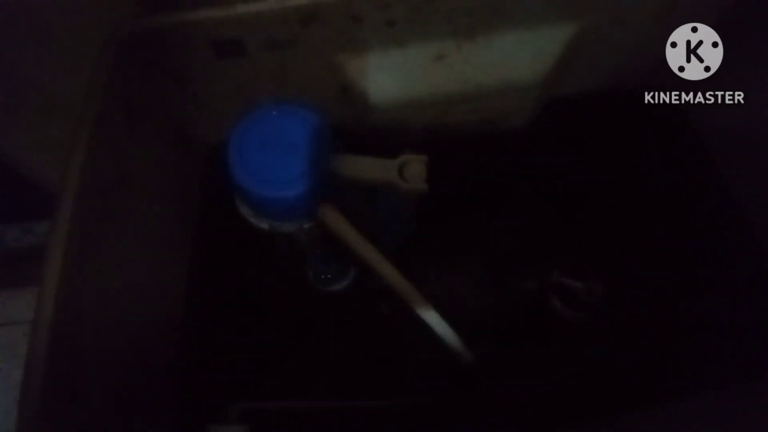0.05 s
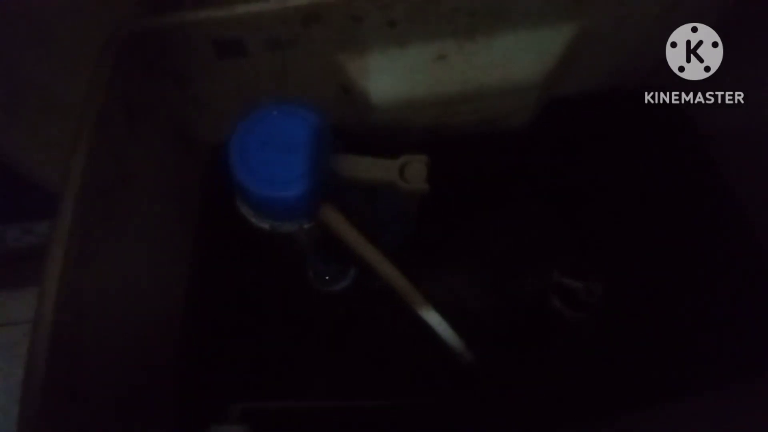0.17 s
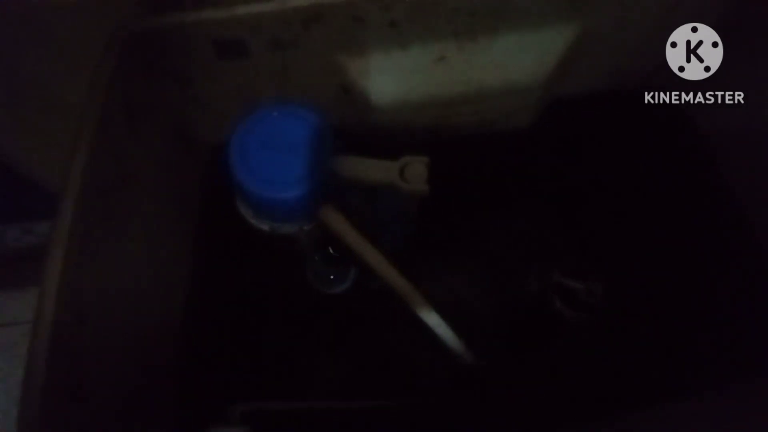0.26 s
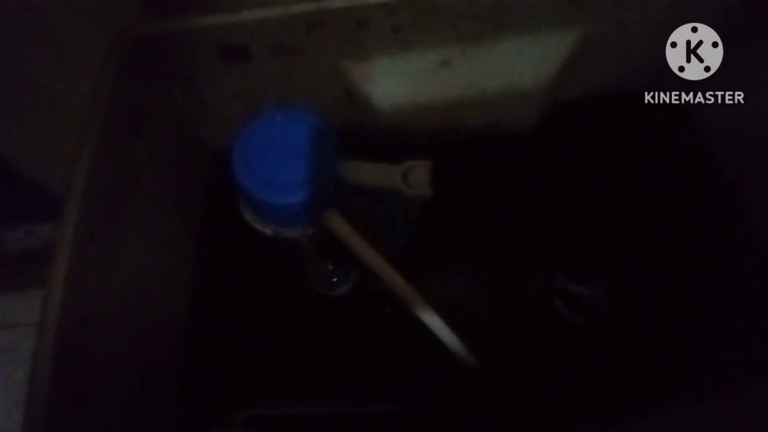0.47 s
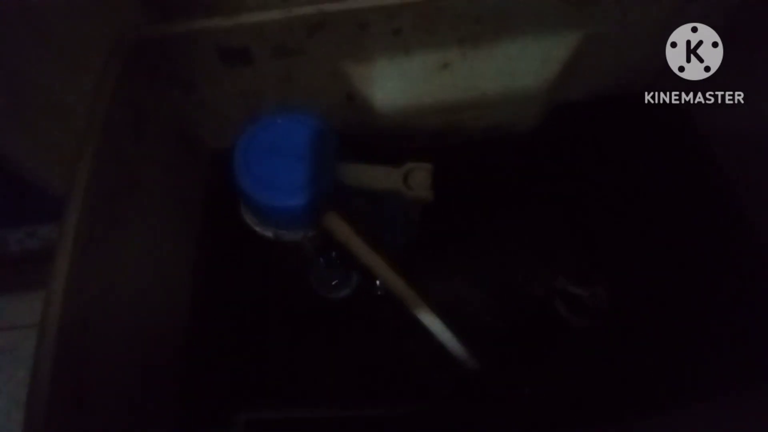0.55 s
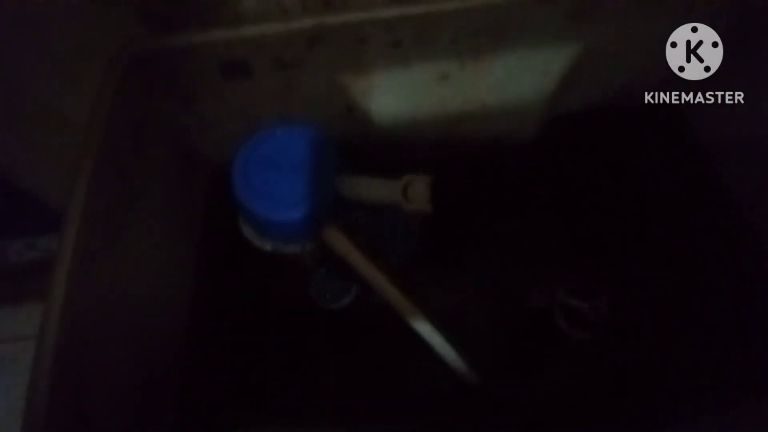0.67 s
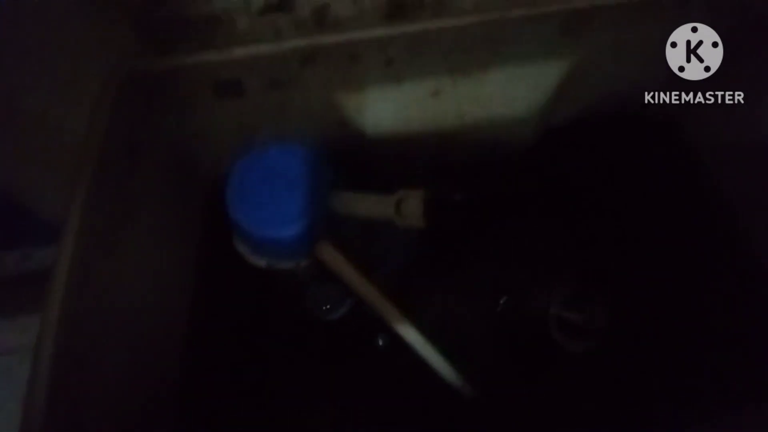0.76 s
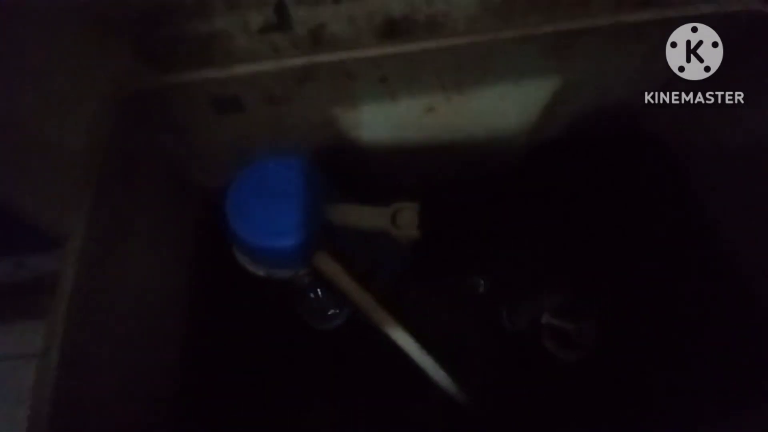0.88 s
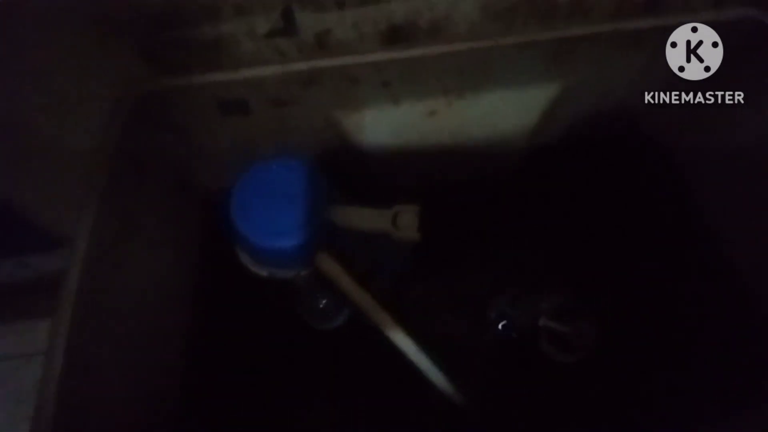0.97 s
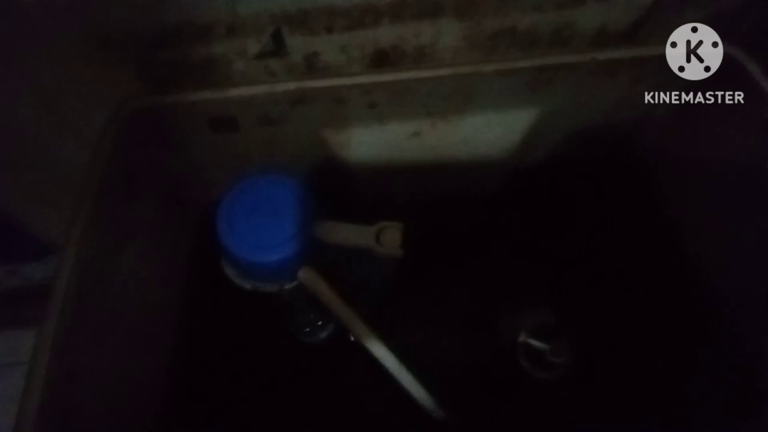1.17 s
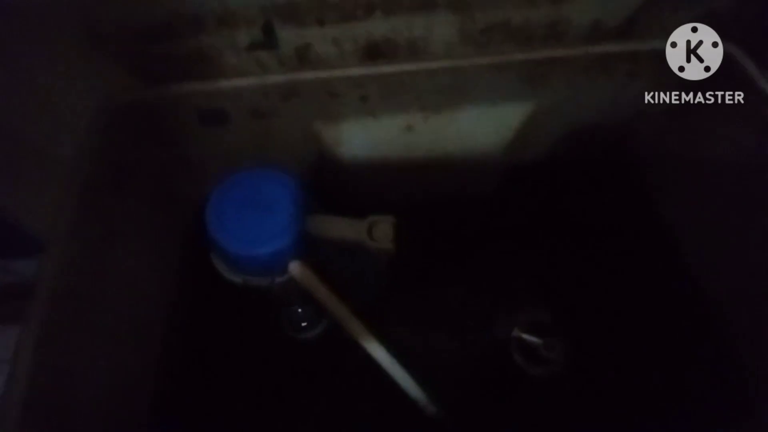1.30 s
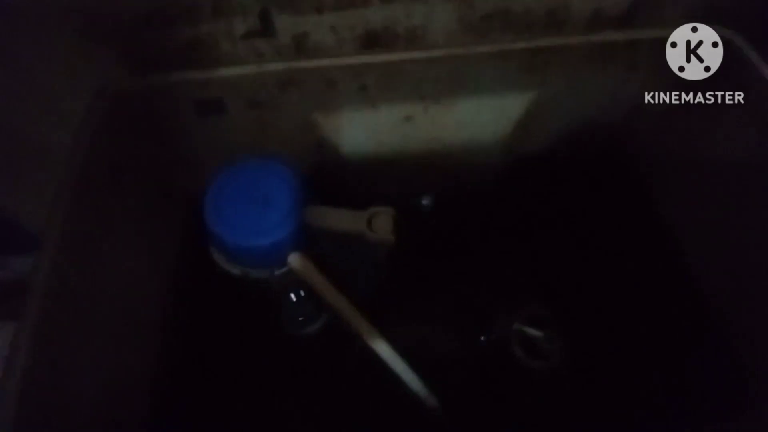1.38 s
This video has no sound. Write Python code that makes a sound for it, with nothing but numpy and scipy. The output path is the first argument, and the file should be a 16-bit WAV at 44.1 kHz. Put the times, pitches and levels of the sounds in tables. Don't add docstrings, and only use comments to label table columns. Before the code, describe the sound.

Knocks ring hollow in an open toilet tank, heard close in a small tiled room. Until 0.45 s, soft taps and faint rattles sit over hissing valve spray. From 0.5 to 0.9 s come rapid loud thuds and clacks, with splashes strongest near 0.62 and 0.77 s and a low gurgle. A last firm thud lands near 1.06 s; then spray fades, leaving tiny drips and faint rumble until about 1.45 s.

```python
import sys
import numpy as np
from scipy import signal
from scipy.fft import rfft, irfft
from scipy.io import wavfile

SR = 44100
rng = np.random.default_rng(int(sys.argv[2]) if len(sys.argv) > 2 else 0)


def to_wav(sig):
    pcm = np.clip(np.atleast_2d(sig), -1, 1) * 32767
    pcm = np.round(pcm).astype(np.int16)
    wavfile.write(sys.argv[1], SR, pcm.T)


def makeup_ratio(level_db):
    decades = np.asarray(level_db, float) / 20
    return 10 ** decades


N = 63945

# (frequency [Hz], level [dB])
MIDDLE_MODES = [(712, 0.5), (782, 1.5), (809, 1.5), (862, -4.5), (945, 3), (1050, -9), (1140, -12.5)]
# (frequency [Hz], level [dB])
UPPER_MODES = [(1211, -15.5), (1325, 0), (1520, -2.5), (1686, 3), (1760, 0.5), (1974, -16.5), (2075, -1),
               (2326, -7.5), (2616, -8.5), (2750, -19), (2850, -5), (3250, -26), (3600, -7.5), (4050, -0.5)]


def thuds():
    # (time [s], level [dB], pitch [Hz], time until damped [s])
    thud_events = [(.02, -40.5, 214.4, 0.11), (.09, -56, 207, 0.14), (.178, -30.5, 206.3, 0.088),
                   (.222, -31.5, 226, 0.037), (.342, -38.5, 208.3, 0.12), (.44, -25.5, 206, 0.15),
                   (.526, -10, 226.5, 0.042), (.57, -9, 230.5, 0.01), (.627, -9.5, 218.2, 0.041),
                   (.672, -22.5, 254, 0.023), (.72, -20, 268, 0.045), (.756, -9.5, 214.5, 0.017),
                   (.795, -16.5, 198.2, 0.067), (.865, -11, 211.5, 0.024), (.915, -24, 211, 0.031),
                   (.962, -25, 199, 0.043), (1.005, -24, 198.6, 0.029), (1.058, -11, 204.8, 0.043),
                   (1.11, -21, 208.8, 0.032), (1.14, -21.5, 203.4, 0.027), (1.19, -29.5, 184.7, 0.039),
                   (1.282, -42.5, 210, 0.032)]
    # (frequency [Hz], level [dB])
    lower_modes = [(84.7, -29.5), (140, -1), (157.7, -3.5), (200, -7), (266, -0.5), (321.2, -3.5),
                   (405, -13), (480, -17.5), (548, -30)]
    return knocks(thud_events, lower_modes, t60=0.39, rise_s=0.0088, modes_db=-6.5, reach_oct=0.28,
                  damped_db=-12.0, rough=0.17, rough_hz=39.7, cuts_last=-12)


def taps():
    # (time [s], level [dB], pitch [Hz], time until damped [s])
    tap_events = [(.18, -35.5, 750, 0.038), (.206, -21, 924.6, 0.018), (.235, -28.5, 759, 0.039),
                  (.258, -28, 890, 0.019), (.293, -25, 929, 0.05), (.402, -17, 897, 0.029),
                  (.488, -21.5, 900, 0.0048), (.5, -23.5, 769, .025), (.526, -21, 832, 0.036),
                  (.558, -12, 838, 0.01), (.573, -10.5, 775, 0.027), (.575, -12, 953, 0.0065),
                  (.617, -8, 785.7, 0.0082), (.633, -14.5, 813, 0.0048), (.656, -21, 703, 0.013),
                  (.682, -25, 807, 0.017), (.72, -30, 810, 0.029), (.757, -24, 817, 0.0044),
                  (.766, -13.5, 804.3, 0.0076), (.785, -24.5, 803, 0.023), (.834, -17.5, 793, 0.01),
                  (.865, -20, 800, 0.022), (.905, -18.5, 795, 0.0093), (.932, -20, 821, 0.0079),
                  (.95, -25.5, 816, 0.014), (.978, -26.5, 779, 0.0055), (.997, -35.5, 755, 0.0075),
                  (1.015, -31, 852, 0.021), (1.04, -35, 837, 0.024), (1.09, -46, 886, 0.026),
                  (1.16, -56, 923, 0.051), (1.277, -39, 721, 0.11)]
    return knocks(tap_events, MIDDLE_MODES, t60=0.27, rise_s=0.0021, modes_db=-12.5, reach_oct=0.15,
                  damped_db=-11.5, rough=0.37, rough_hz=73.0, cuts_last=-5.0)


def clacks():
    # (time [s], level [dB], pitch [Hz], time until damped [s])
    clack_events = [(.018, -36, 3900, 0.016), (.03, -33.5, 3120, 0.038), (.06, -32.5, 1480, 0.022),
                    (.085, -30.5, 2140, .04), (.14, -36, 2110, 0.026), (.11, -31.5, 2702, 0.16),
                    (.222, -34.5, 1558, .03), (.207, -29, 2030, 0.034), (.335, -35.5, 2850, 0.016),
                    (.402, -30.5, 1547, 0.042), (.496, -25, 2314, 0.13), (.497, -30, 2662, 0.063),
                    (.495, -28, 1305, 0.018), (.525, -25.5, 1222, 0.039), (.538, -16, 1668, 0.0074),
                    (.55, -23, 1522, 0.032), (.556, -31.5, 1843, 0.014), (.595, -37, 1600, .015),
                    (.616, -25, 1194, 0.024), (.545, -20.5, 2039, 0.043), (.557, -26, 1237, 0.015),
                    (.618, -18.5, 1970, 0.017), (.627, -26.5, 2557, 0.032), (.64, -28, 1576, 0.023),
                    (.65, -27, 1215, 0.15), (.766, -27, 3265, 0.18), (.758, -28.5, 4380, 0.033),
                    (.775, -13.5, 2329, 0.048), (.757, -24, 1216, 0.046), (.765, -26.5, 4060, 0.026),
                    (.766, -27, 2887, 0.026), (.78, -23, 2102, 0.026), (.782, -33, 1517, 0.036),
                    (.785, -22.5, 2614, 0.06), (.779, -16.5, 1688, 0.055), (.815, -29.5, 1165, 0.095),
                    (.868, -34, 1218, 0.1), (.97, -40.5, 2030, 0.02), (1.018, -29.5, 1314, 0.026),
                    (1.015, -36.5, 1792, 0.029), (1.06, -40.5, 1313, 0.11), (1.1, -39, 1732, 0.035),
                    (1.19, -40, 2150, 0.051), (1.295, -38, 1339, 0.078), (1.29, -49, 1765, 0.033),
                    (1.355, -47.5, 3110, 0.0052)]
    return knocks(clack_events, UPPER_MODES, t60=0.46, rise_s=0.0036, modes_db=-7.5, reach_oct=0.18,
                  damped_db=-14.0, rough=0.5, rough_hz=149, cuts_last=-0.2)


def knocks(rows, modes, t60, rise_s, modes_db, reach_oct, damped_db, rough, rough_hz, cuts_last):
    damp_s = 0.004
    t = np.arange(SR // 3) / SR
    out = np.zeros(N + SR)
    hz, level_db = np.transpose(modes)[:, :, None]
    decay = np.log(1000) * t / t60
    fade_out = np.cos(t / t[-1] * np.pi / 2)
    rise = np.sin(np.pi / 2 * np.minimum(t / rise_s, 1)) ** 2

    luck = rng.standard_normal((len(rows), 2, len(modes), 1))
    grit = rng.standard_normal((len(rows), 2, 4, len(t)))
    grit = rms_one(signal.sosfilt(signal.butter(3, rough_hz, fs=SR, output="sos"), grit))
    waver = (1 - rough) + rough * (grit[:, 0] + 1j * grit[:, 1]) / np.sqrt(2)

    next_times = [row[0] for row in rows[1:]] + [9]
    for (s, db, near_hz, hold), after, (gain, phase), wobble in zip(rows, next_times, luck, waver):
        distance = np.minimum((np.log2(hz / near_hz) / reach_oct) ** 2, 3.5)
        weight = makeup_ratio(modes_db + level_db + 2.0 * gain - 4.97 * distance)
        body = weight * np.exp(2j * np.pi * (hz * t + phase) - decay) * wobble[np.arange(len(modes)) % 3]
        own = np.exp(2j * np.pi * near_hz * t - decay) * (1 + wobble[3]) / 2
        damping = damped_db * np.clip((t - hold) / damp_s, 0, 1)
        damping = damping + cuts_last * np.clip((t + s - after) / damp_s, 0, 1)
        shape = rise * makeup_ratio(db + damping) * fade_out
        out[int(s * SR):][:len(t)] += shape * (own + body.sum(axis=0)).imag
    return out[:N]


def splashes():
    # (time [s], level [dB], rise [s], t60 [s], brightness of the top [dB])
    splash_events = [(0.018, -33, 0.012, 0.98, -7), (.1, -54, 0.024, 0.21, 18),
                     (0.21, -45, 0.0044, 0.15, -19), (0.363, -38, 0.005, 0.21, 15),
                     (0.495, -39.5, 0.0097, 0.36, 5.5), (.545, -32.5, 0.0072, 0.3, 5),
                     (0.618, -24, 0.0045, 0.42, 6), (0.757, -20, 0.0049, 0.3, 7.5),
                     (.768, -18.5, 0.011, 0.35, 2), (0.866, -62, .005, 0.27, 0),
                     (1.016, -39, 0.017, 0.59, 5.5), (1.065, -41, 0.027, 0.39, 16),
                     (1.238, -47.5, 0.0086, 0.16, 11)]
    # (frequency [Hz], level per Hz [dB])
    splash_colour = [(300, -10.5), (600, -16.5), (2000, -2), (3200, 5), (4500, -10.5), (6000, -22),
                     (10000, -41), (15500, -54.5)]
    t = np.arange(N) / SR
    hiss = coloured(splash_colour, 2.0, rng.standard_normal(N))
    sung = 0
    for hz, db in MIDDLE_MODES + UPPER_MODES:
        sung = sung + makeup_ratio(db / 2 + 3 * drift(15.0)) * ring(hiss, hz, t60=0.094)
    hiss = hiss + makeup_ratio(-5) * rms_one(sung)
    top = signal.sosfilt(signal.butter(2, 4920, "high", fs=SR, output="sos"), hiss)

    out = np.zeros(N)
    for s, db, rise, t60, bright_db in splash_events:
        envelope = makeup_ratio(db - 60 * np.maximum(t - s, 0) / t60) * np.clip((t - s) / rise, 0, 1)
        out += envelope * (hiss + (makeup_ratio(bright_db) - 1) * top)
    return out


def spray():
    # (time [s], level [dB])
    flow_levels = [(0, -35.5), (.1, -37), (.2, -37), (.3, -39.5), (.47, -38), (.6, -37.5), (.7, -37),
                   (.745, -43), (.8, -35.5), (1.0, -42), (1.15, -47.5), (1.28, -55.5), (1.45, -60)]
    # (frequency [Hz], level per Hz [dB])
    spray_colour = [(150, -23.5), (600, -18.5), (800, 0), (1200, -2), (2700, 3.5), (4300, -11),
                    (6500, -26.5), (15500, -53.5)]
    drops_per_s, drop_db, into_tank_db = 980, -18, -3
    landing = rng.random(N) < drops_per_s / SR
    drop_size = makeup_ratio(2.9 * np.minimum(rng.exponential(1, N), 5))
    drops = landing * drop_size * rng.choice([-1, 1], N)
    jet = coloured(spray_colour, 2, rng.standard_normal(N) + makeup_ratio(drop_db) * rms_one(drops))
    sung = 0
    for hz, db in MIDDLE_MODES + UPPER_MODES:
        sung = sung + makeup_ratio(db + 3 * drift(7.9)) * ring(jet, hz, t60=0.16)
    s, db = np.transpose(flow_levels)
    flow = makeup_ratio(np.interp(np.arange(N) / SR, s, db))
    return flow * (jet + makeup_ratio(into_tank_db) * rms_one(sung))


def ticks():
    # (time [s], level [dB], pitch [Hz])
    tick_events = [(.18, -59, 11000), (.2, -45, 9300), (.993, -50, 12540), (1.047, -53.5, 10000),
                   (1.077, -44, 5620), (1.09, -61, 14100), (1.123, -53, 9100), (1.163, -66, 12900),
                   (1.21, -69, 8500), (1.24, -66, 8400), (1.266, -53, 5760), (1.333, -57, 13500),
                   (1.335, -62, 10800), (1.376, -67, 12300), (1.393, -57, 13100), (1.396, -41, 5870),
                   (1.445, -60, 10300)]
    cycles, pitch_spread = 19, 0.21
    t = np.arange(SR // 30) / SR
    out = np.zeros(N + SR)
    spreads = rng.uniform(-1.4, 1, (len(tick_events), 3, 1))
    for (s, db, hz), spread in zip(tick_events, spreads):
        tone = np.sin(2 * np.pi * hz * (1 + pitch_spread * spread) * t).sum(axis=0)
        envelope = makeup_ratio(db - 60 * t * hz / cycles) * np.minimum(t / 0.0012, 1)
        out[int(s * SR):][:len(t)] += envelope * tone
    return out[:N]


def fizz():
    # (time of the peak [s], level [dB], pitch [Hz], half length [s])
    fizz_patches = [
        (.12, -49, 5700, 0.025),
        (0.19, -57.5, 5900, .04),
        (0.38, -47.5, 5800, 0.012),
        (0.65, -51.5, 6300, 0.044),
        (.645, -60, 13500, 0.026),
        (.785, -64, 13000, 0.033),
        (1.15, -62, 5600, 0.027),
        (0.565, -38, 416, 0.052),
        (0.652, -38, 498, 0.036),
    ]
    half_width = 0.09
    t = np.arange(N) / SR
    white = rng.standard_normal(N)
    out = np.zeros(N)
    for s, db, hz, half in fizz_patches:
        edges_hz = [hz * (1 - half_width), hz * (1 + half_width)]
        band = signal.butter(2, edges_hz, "band", fs=SR, output="sos")
        swell = np.exp(-((t - s) / half) ** 2)
        out += makeup_ratio(db) * swell * rms_one(signal.sosfilt(band, white))
    return out


def bathroom(x):
    t60_s, wall_cut_hz = 0.44, 3400
    size = 2 ** 17
    w = np.pi * np.arange(size // 2 + 1) / (size // 2)
    dull = 1 / (1 + 1j * w * SR / (2 * np.pi * wall_cut_hz))
    echoes = 0
    for k, lag in enumerate(rng.uniform(0.011, 0.037, 10)):
        loop = makeup_ratio(-60 * lag / t60_s) * dull * np.exp(-1j * w * int(lag * SR))
        echoes = echoes + (-1) ** k * loop / (1 - loop)
    return irfft(rfft(x, size) * echoes, size)[:N]


def rumble():
    # (frequency [Hz], level per Hz [dB])
    hum_colour = [(30, -63.5), (130, 0), (260, 0.5), (580, -13), (760, -17), (3000, -16), (6000, -30),
                  (15500, -50)]
    return makeup_ratio(-50) * coloured(hum_colour, 2, rng.standard_normal(N))


def coloured(spectrum, patchy_db, white):
    hz, db = np.transpose(spectrum)
    bins_hz = np.maximum(np.arange(N // 2 + 1) * SR / N, 1)
    shaped = rfft(white) * makeup_ratio(np.interp(np.log(bins_hz), np.log(hz), db))
    together = drift(6.2)
    out = 0
    for centre in np.arange(4, 14.6, 0.5):
        share = np.clip(1 - np.abs(np.log2(bins_hz) - centre) * 2, 0, 1)
        flicker = makeup_ratio(patchy_db * (1.48 * together + drift(12.0)))
        out = out + irfft(shaped * share, N) * flicker
    return rms_one(out)


def ring(drive, hz, t60):
    r = makeup_ratio(-60 / (t60 * SR))
    w = 2 * np.pi * hz / SR
    return signal.lfilter([0, np.sin(w) / np.sqrt(t60)], [1, -2 * r * np.cos(w), r * r], drive)


def drift(rate):
    r = np.exp(-80 * np.pi * rate / SR)
    white = rng.standard_normal(N // 40 + 2002)
    slow = signal.lfilter([1], [1, -2 * r, r * r], white)[2000:]
    return np.interp(np.arange(N) / 40, np.arange(len(slow)), rms_one(slow))


def rms_one(x):
    return x / np.sqrt(np.mean(x ** 2) + 1e-20)


def scene():
    near = thuds() + taps() + clacks() + splashes() + spray() + ticks() + fizz()
    room = makeup_ratio(-16) * bathroom(near)
    return (near + room + rumble())[None]


def band_limit(x):
    return signal.sosfilt(signal.butter(12, 15550, fs=SR, output="sos"), x)


def record(dry):
    limit = 0.9
    heard = signal.sosfilt(signal.butter(4, 70, "high", fs=SR, output="sos"), dry)
    return band_limit(limit * np.tanh(heard / limit))


dry = scene()
out = record(dry)
to_wav(out)
```